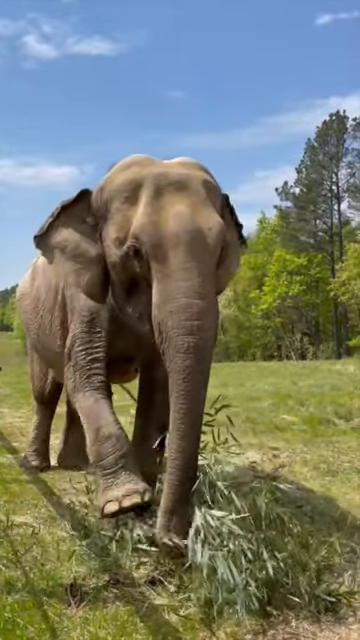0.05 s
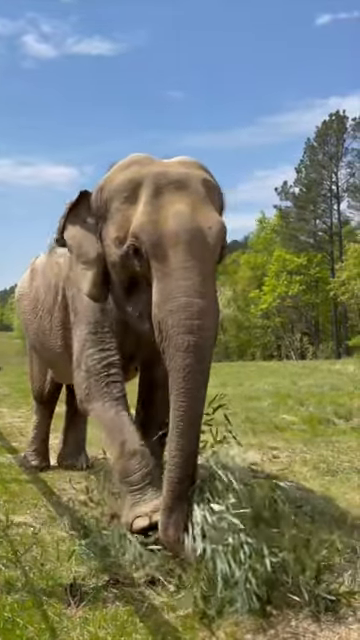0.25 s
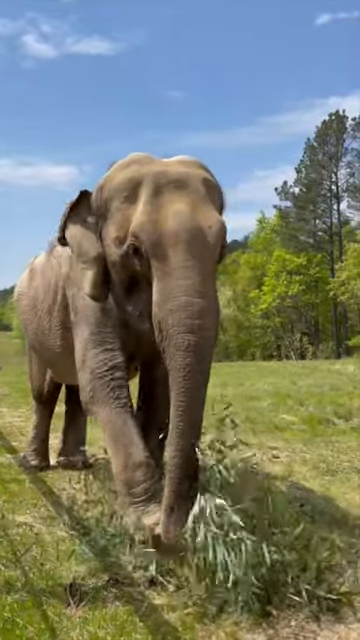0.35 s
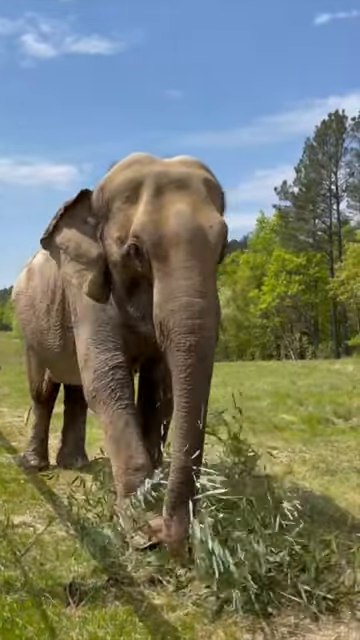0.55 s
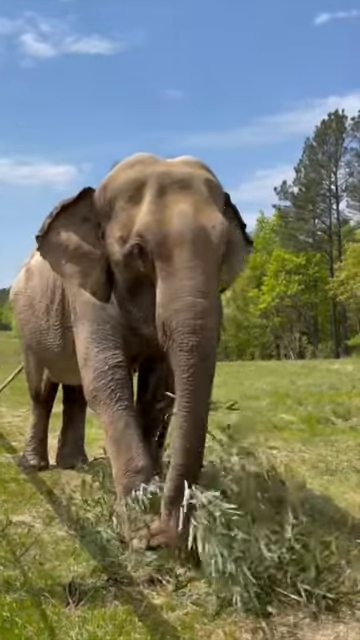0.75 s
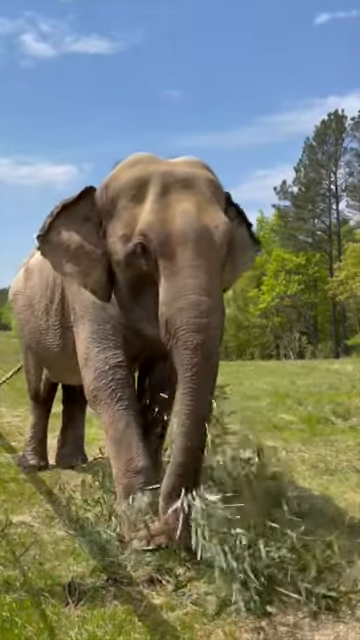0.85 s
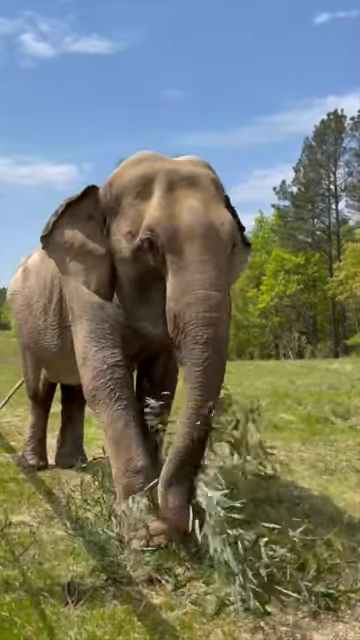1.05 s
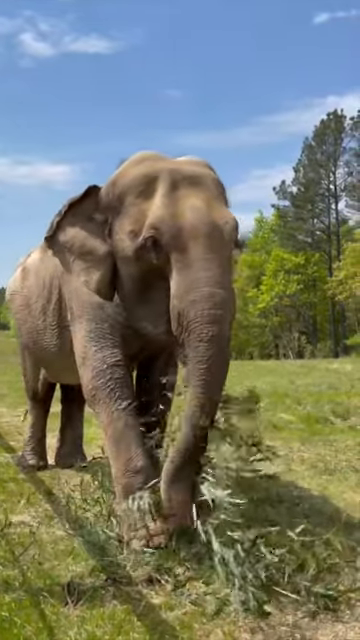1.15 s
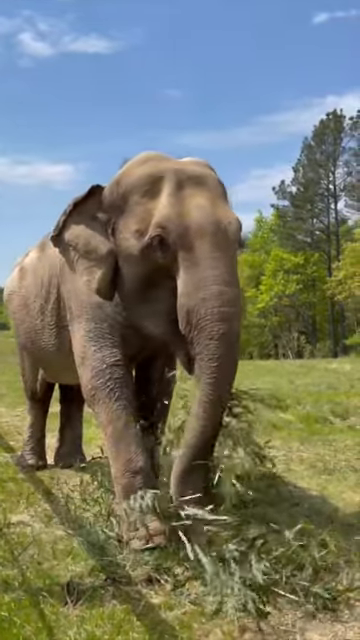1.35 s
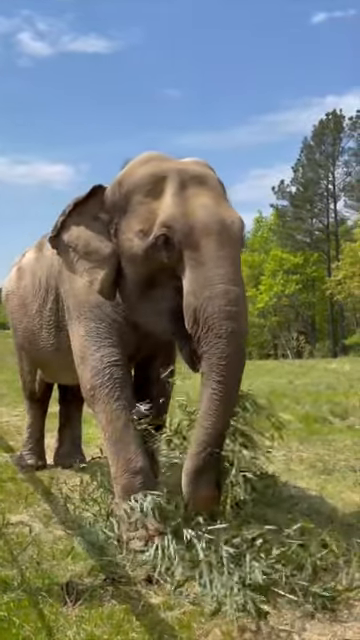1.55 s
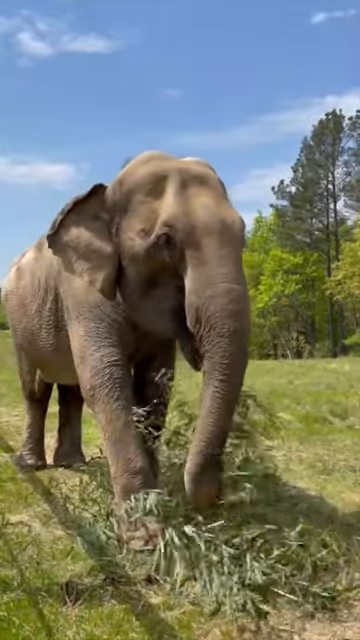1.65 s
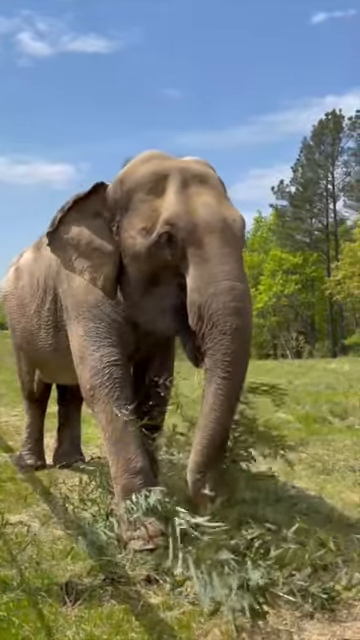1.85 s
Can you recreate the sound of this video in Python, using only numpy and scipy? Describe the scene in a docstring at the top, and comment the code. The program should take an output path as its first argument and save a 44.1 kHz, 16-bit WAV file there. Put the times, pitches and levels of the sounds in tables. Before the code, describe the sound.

Bamboo leaves rustle and stalks snap as an elephant pulls them, over low wind rumble.

```python
"""Elephant in the bamboo

A meadow, with a stereo microphone a few metres from an elephant that treads on leafy bamboo and pulls
it apart with its trunk. Leaves rustle as countless tiny ticks, twigs crackle and stalks crack. Early on
a gust buffets the microphone; a low rumble of wind and faint open air lie underneath."""
import sys
import numpy as np
from scipy import signal
from scipy.fft import rfft, irfft
from scipy.io import wavfile

SR = 44100
rng = np.random.default_rng(int(sys.argv[2]) if len(sys.argv) > 2 else 0)


def digitize_waveform(pressure):
    """Quantize a signal to 16-bit integers and store it at the path in sys.argv[1].

    Rows of a 2-D input are taken as channels; values are limited to [-1, 1].
    """
    field = np.atleast_2d(pressure).T
    bounded = np.clip(field, -1, 1)
    quanta = np.round(bounded * 32767).astype(np.int16)
    wavfile.write(sys.argv[1], SR, quanta)


N = 83790
WIND_WIDTH_DB, BAMBOO_WIDTH_DB = -20, -12  # side level against mid
ATTACK_S = .0003  # rise of every break


def undb(db):
    """Decibels to gain."""
    return 10 ** (np.asarray(db) / 20)


def unit(x):
    """Scale to an rms of one."""
    return x / np.sqrt(np.mean(x ** 2))


def curve(points):
    """Gain over time from (time_s, level_db) points."""
    return undb(np.interp(np.arange(N) / SR, *np.array(points).T))


def response(points):
    """Gain per frequency bin from (frequency_hz, level_db) points."""
    hz, db = np.array(points).T
    return undb(np.interp(np.log(np.arange(N + 1) * SR / (2 * N) + 1), np.log(hz), db))


def filtered(x, gains):
    """Apply one gain per frequency bin."""
    return irfft(rfft(x, 2 * N) * gains)[..., :N]


def colour(x, points):
    """Causal filter of the given colour that keeps the power of white noise."""
    cepstrum = irfft(np.log(unit(response(points))))
    cepstrum[1:N] *= 2
    cepstrum[N + 1:] = 0
    return filtered(x, np.exp(rfft(cepstrum)))


def stereo(mid, side):
    """Left and right from mid and side."""
    return np.array([mid + side, mid - side])


def noise(width_db):
    """Stereo noise, mostly alike in both channels."""
    return stereo(rng.standard_normal(N), undb(width_db) * rng.standard_normal(N))


def ticks(per_s, spread_db):
    """Dense tiny fractures, most weak and a few strong."""
    impulses = (rng.random(N) < per_s / SR) * rng.choice([-1, 1], N)
    strength_db = spread_db * np.minimum(rng.exponential(size=N), 6)
    return unit(impulses * undb(strength_db))


def burst(start_s, decay_s, scatter_db=-19, scatter_s=.010):
    """Envelope of one break: abrupt attack, quick decay, faint scatter off the ground and the heap."""
    age = np.maximum(np.arange(N) / SR - start_s, 0)
    scatter = undb(scatter_db) * np.exp(-age / scatter_s)
    return np.minimum(age / ATTACK_S, 1) * (np.exp(-age / decay_s) + scatter)


# Lead of the left channel in the treble: frequency_hz, phase_rad
LEFT_LEAD = [(2400, 0), (4000, .7), (4500, 1.5), (5300, 5.5), (6000, 6.28), (6800, 6.6), (7400, 8),
             (8200, 9), (9200, 9.5), (11200, 11.3), (11900, 12.56)]

def treble_phase_shift(x):
    """The phase of the treble shifts between the two channels."""
    lead = np.interp(np.arange(N + 1) * SR / (2 * N), *np.array(LEFT_LEAD).T)
    return filtered(x, np.exp(1j * stereo(0, lead / 2)))


# Colour of the open air: frequency_hz, level_db
AIR_COLOUR = [(100, 10), (300, 9), (550, 1.5), (900, 0), (1300, -3.5), (1900, 0.5), (3100, -12.5),
              (5000, -26), (10500, -43), (14000, -46)]
# Its diffuse share, unlike in the two channels: frequency_hz, side_db
AIR_WIDTH = [(200, -8), (550, -2.5), (1000, -1.5), (1600, -17), (2500, -38), (4000, -5.5)]

def meadow_air(level_db=-52, left_hz=715, left_db=8.5):
    """Faint steady air in distant trees, louder on the left around left_hz."""
    side = filtered(rng.standard_normal(N), response(AIR_WIDTH))
    air = colour(stereo(rng.standard_normal(N), side), AIR_COLOUR)
    lean = response([(left_hz / 2, 0), (left_hz, left_db / 2), (left_hz * 2, 0)])
    return undb(level_db) * treble_phase_shift(filtered(air, np.array([lean, 1 / lean])))


# Colour of the wind rumble: frequency_hz, level_db
RUMBLE_COLOUR = [(15, -55), (35, -22), (60, -7), (85, -6.5), (105, 5), (130, 1.5), (157, -7), (190, 2.5),
                 (235, -12.5), (280, -10), (350, -25), (600, -31.5), (2000, -93.5)]
# Its course: time_s, level_db
RUMBLE_LEVEL = [(0, -40.5), (.8, -40.5), (.95, -58), (1.15, -46.5), (1.35, -42.5), (1.48, -40), (1.7, -41),
                (1.9, -39.5)]

def wind_rumble():
    """Low wind noise that dips briefly about a second in."""
    return curve(RUMBLE_LEVEL) * colour(noise(WIND_WIDTH_DB), RUMBLE_COLOUR)


# Colour of the gust: frequency_hz, level_db
GUST_COLOUR = [(15, -55), (30, -17), (50, 3), (75, 0.5), (120, -4), (180, -8), (260, -24.5), (400, -34.5),
               (700, -54.5), (2000, -81)]
# Its strength at the microphone: time_s, level_db
GUST_LEVEL = [(0, -21), (.05, -51), (.20, -46), (.245, -27.5), (.275, -26), (.335, -39), (.39, -32.5),
              (.435, -27.5), (.47, -31), (.54, -37), (.61, -23.5), (.645, -37), (.69, -24.5), (.72, -45),
              (.75, -49), (.85, -51), (1.0, -46.5), (1.2, -61), (1.9, -46)]

def gust():
    """Turbulence right on the microphone, heard as deep, uneven buffeting."""
    return curve(GUST_LEVEL) * colour(noise(WIND_WIDTH_DB), GUST_COLOUR)


# Colour of leaves and twigs from a few metres: frequency_hz, level_db
LEAF_COLOUR = [(300, -37), (1000, -11), (2000, -16.5), (3200, -13), (4200, -9), (5500, -7.5), (7500, -7),
               (9000, -16), (10000, 1), (10900, 3.5), (12000, -10.5), (13000, -22), (13800, -32),
               (15500, -45)]
# How hard the foliage is stirred: time_s, level_db
LEAF_STIR = [(0, -48), (.08, -51), (.12, -46.5), (.19, -49), (.29, -46), (.40, -46.5), (.50, -55),
             (.62, -54), (.78, -53.5), (.86, -47.5), (.93, -50.5), (1.02, -45), (1.15, -41.5), (1.20, -45),
             (1.35, -45.5), (1.43, -48.5), (1.56, -49), (1.78, -49.5), (1.9, -55.5)]

def leaf_rustle(per_s=5000, spread_db=2):
    """Stirred leaves give off countless tiny ticks that merge into a rustle."""
    mid = ticks(per_s, spread_db)
    side = undb(BAMBOO_WIDTH_DB) * ticks(per_s, spread_db)
    return colour(curve(LEAF_STIR) * stereo(mid, side), LEAF_COLOUR)


# Leaves and thin twigs tearing: start_s, level_db, decay_s, low_edge_hz
TEARS = [(0.036, -27.5, 0.0012, 6840), (0.11, -38.5, .008, 4000), (0.167, -43.5, 0.004, 3000),
         (0.29, -41, .003, 2000), (0.303, -37, 0.0027, 2000), (0.393, -45, .003, 1000),
         (0.43, -48, 0.0015, 2000), (0.802, -30, 0.0025, 5500), (0.9714, -32.5, 0.0058, 1000),
         (1.011, -39, 0.0044, 800), (1.021, -33.5, 0.0013, 800), (1.1005, -32, 0.0059, 2000),
         (1.138, -37, .003, 5000), (1.1509, -27.5, 0.002, 1510), (1.161, -38.5, 0.0068, 1000),
         (1.2204, -30.5, 0.0018, 3000), (1.2348, -33, 0.0097, 805), (1.323, -31.5, 0.006, 3000),
         (1.337, -31, 0.0068, 2520), (1.3736, -35, 0.0059, 3000), (1.487, -39.5, 0.0098, 2000),
         (1.5325, -32.5, 0.0056, 800), (1.535, -40, 0.003, 2960), (1.6224, -34.5, 0.0044, 6000),
         (1.713, -38, .002, 8000)]

def twig_crackle():
    """Each tear is a short burst of noise; thinner tears sound higher."""
    fibres = noise(BAMBOO_WIDTH_DB)
    tearing = np.zeros((2, N))
    for start_s, level_db, decay_s, low_edge_hz in TEARS:
        highpass = signal.butter(2, low_edge_hz, "high", fs=SR, output="sos")
        tearing += signal.sosfilt(highpass, undb(level_db) * burst(start_s, decay_s) * fibres)
    return colour(tearing, LEAF_COLOUR)


# Colour of stems and stalks from a few metres: frequency_hz, level_db
STALK_COLOUR = [(200, -17), (500, -11), (800, 6), (1400, -2), (2000, -0.5), (2700, -2.5), (3800, -8.5),
                (6000, -0.5), (12000, -48)]
# Stems crushed underfoot, then dragged by the trunk: time_s, level_db
CRUSH_LEVEL = [(.22, -73), (.30, -59), (.41, -55), (.47, -86), (.85, -73), (1.0, -55), (1.16, -57),
               (1.36, -56), (1.45, -75)]

def stem_crush():
    """Crushed stems give way in coarser grains than leaves."""
    return colour(curve(CRUSH_LEVEL) * ticks(per_s=900, spread_db=2.5), STALK_COLOUR)


# Single eddies hitting the microphone: time_s, peak_db, pitch_hz
EDDIES = [(0.2536, -22.5, 125), (0.2646, -20.5, 108), (0.2766, -24, 380), (0.2794, -28, 383),
          (0.2813, -10.5, 121), (0.346, -27, 87), (0.389, -24.5, 189), (0.395, -26.5, 172),
          (0.4191, -21.5, 76), (0.4966, -28, 178), (0.6054, -17.5, 125), (0.6136, -20, 178),
          (.646, -24, 77), (0.674, -22, 256), (0.678, -21, 64), (0.756, -35.5, 149), (0.838, -27, 320),
          (0.838, -34, 122), (0.869, -31, 177)]

def eddy_thumps(low_cut_hz=51.6):
    """Soft pressure pulses ring out through the microphone's low cut, which makes each sink in pitch."""
    low_cut = signal.butter(4, low_cut_hz, "high", fs=SR, output="sos")
    thumps = np.zeros(N)
    for time_s, peak_db, pitch_hz in EDDIES:
        push = np.exp(-((np.arange(N) / SR - time_s) * np.pi * pitch_hz) ** 2)
        soft = signal.sosfilt(signal.butter(2, pitch_hz, fs=SR, output="sos"), np.gradient(push))
        thump = signal.sosfilt(low_cut, soft)
        thumps += undb(peak_db) * thump / np.max(np.abs(thump))
    return thumps


# Colour of the splintering: frequency_hz, level_db
SPLINTER_COLOUR = [(300, -30), (1000, -15), (2700, -3), (4000, -1.5), (6000, -8), (8000, 5.5), (10000, 1.5),
                   (11000, 16.5), (12000, -6), (13300, -32), (15500, -20)]
# Stalks breaking: start_s, snap_db, knock_db, ring_hz, splinter_db
STALK_BREAKS = [(0.8048, -42, -58, 2500, -30), (1.0618, -19.5, -38.5, 2900, -19.5),
                (1.0637, -24.5, -36.5, 830, -34), (1.1065, -16.5, -39, 2950, -27.5),
                (1.3361, -30, -42, 1100, -52), (1.3525, -20, -41.5, 1140, -52),
                (1.5305, -30.5, -37, 1210, -29.5), (1.72, -48, -41.5, 1000, -31),
                (1.744, -40, -47, 1700, -43), (1.7787, -27, -42.5, 760, -30.5),
                (1.783, -31, -42, 2500, -41.5)]

def stalk_cracks(knock_s=.002, splinter_s=.001, ring_db=1, ring_q=1.8):
    """A stalk breaks with a sharp snap, a woody knock and splinters; once split, it rings only briefly."""
    wood, fibres = noise(BAMBOO_WIDTH_DB), noise(BAMBOO_WIDTH_DB)
    stalks, splinters = np.zeros((2, N)), np.zeros((2, N))
    for start_s, snap_db, knock_db, ring_hz, splinter_db in STALK_BREAKS:
        snap = undb(snap_db) * np.sinc(np.arange(N) - np.round((start_s + ATTACK_S) * SR))
        ring = undb(ring_db) * signal.lfilter(*signal.iirpeak(ring_hz, ring_q, fs=SR), snap)
        knock = undb(knock_db) * burst(start_s, knock_s) * wood
        stalks += snap + ring + knock
        splinters += undb(splinter_db) * burst(start_s, splinter_s) * fibres
    return colour(stalks, STALK_COLOUR) + colour(splinters, SPLINTER_COLOUR)


def scene():
    """Bamboo a few metres ahead, wind on the microphone, the meadow all around."""
    bamboo = leaf_rustle() + twig_crackle() + stem_crush() + stalk_cracks()
    wind = gust() + wind_rumble() + eddy_thumps()
    return treble_phase_shift(bamboo) + wind + meadow_air()


def record(dry):
    """The recorder cuts the highest treble."""
    top_hz = 15750
    return signal.sosfilt(signal.ellip(8, .2, 70, top_hz, fs=SR, output="sos"), dry)


dry = scene()
out = record(dry)
digitize_waveform(out)
```